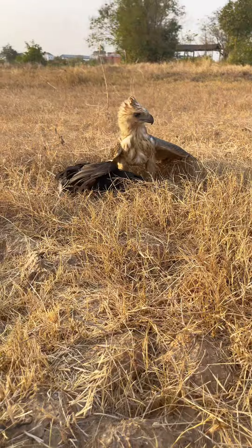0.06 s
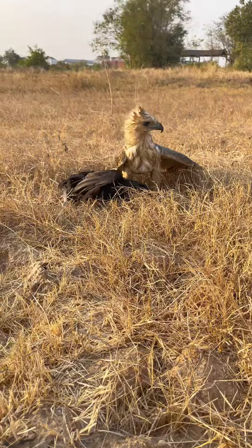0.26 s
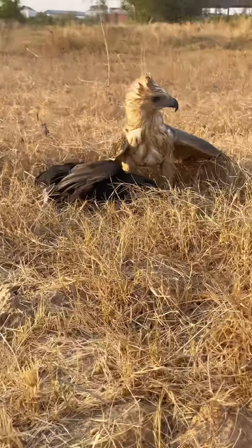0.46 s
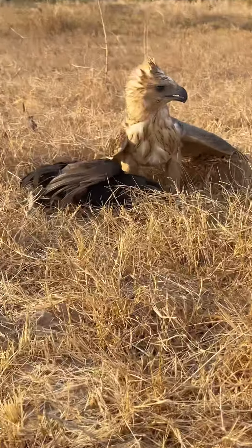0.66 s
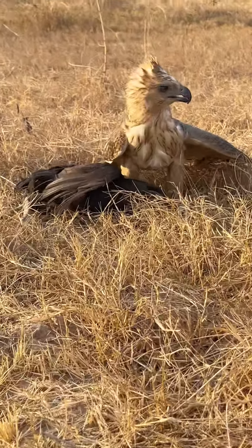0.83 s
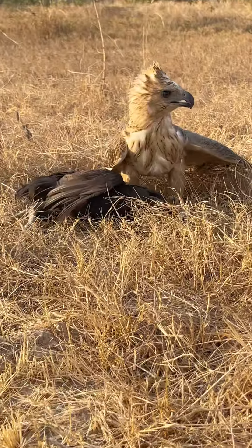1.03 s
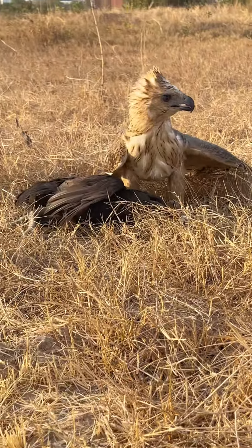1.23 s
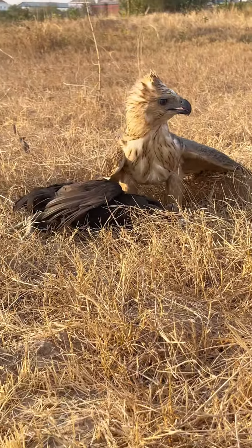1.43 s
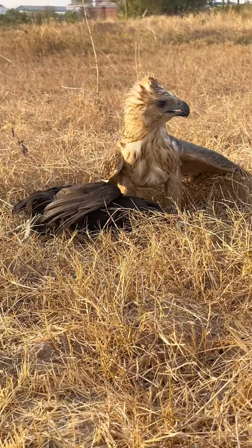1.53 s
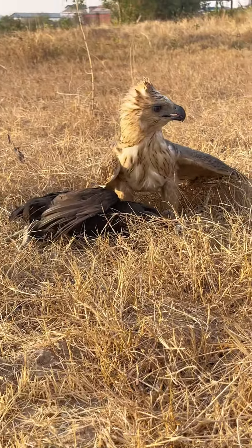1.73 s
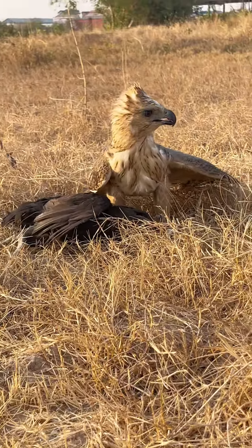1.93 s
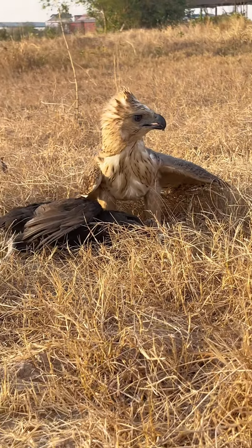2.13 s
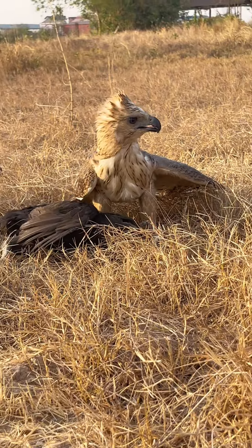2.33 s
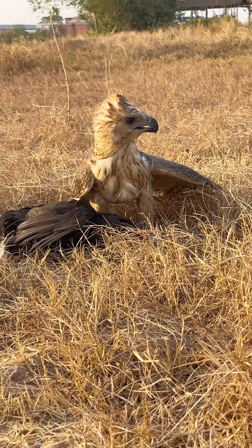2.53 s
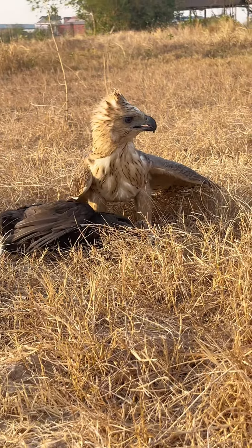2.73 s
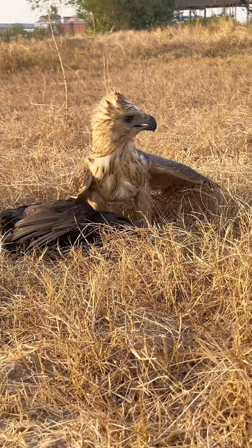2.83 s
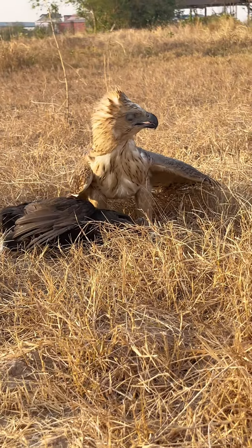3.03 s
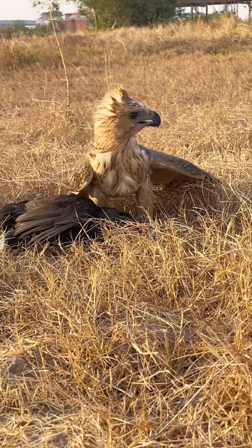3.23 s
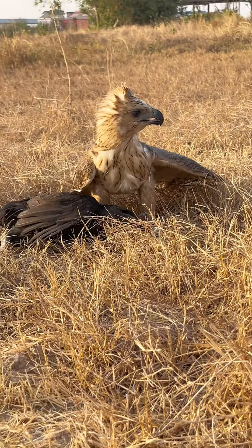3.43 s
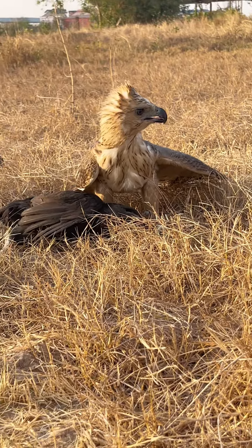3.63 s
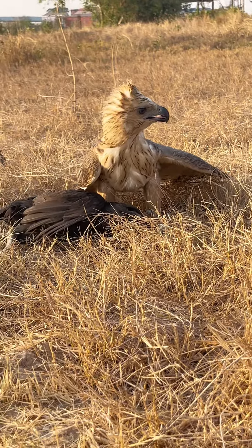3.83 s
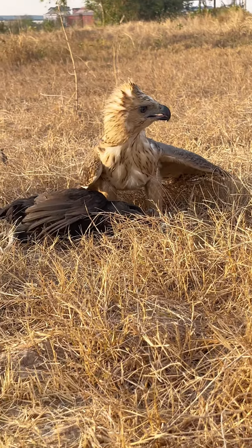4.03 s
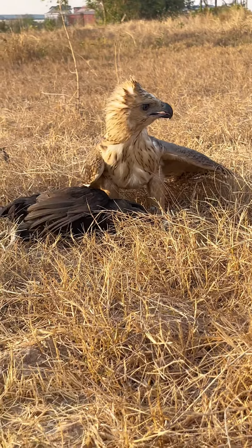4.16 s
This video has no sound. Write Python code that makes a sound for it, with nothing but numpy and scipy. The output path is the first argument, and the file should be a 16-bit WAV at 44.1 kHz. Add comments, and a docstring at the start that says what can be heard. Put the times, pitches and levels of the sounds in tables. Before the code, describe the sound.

Outdoors in a dry open field, a young raptor gives a series of short, thin rising chirps that swell to a brief higher note. A pause follows with dull finger knocks and scuffing on the hand-held phone, then a second series, more knocks, and a faint third series begins. Steady low traffic rumble, soft hiss and tiny distant birds lie beneath.

```python
"""Young bird of prey in a dry field

Rising chirps in series lead to long high notes; a far wall echoes them. Both are sums of a tone and
its overtones. Small birds are short sweeps, a far bird soft falling tones in a diffuse tail. Shaped
noise gives traffic, low scuffing, a haze, high twitter and hiss. Fingers knock (decaying bursts) and
brush (noise puffs) on the hand-held phone. Left leads right by a phase that grows with frequency."""
import sys
import numpy as np
from scipy import signal
from scipy.fft import rfft, irfft, next_fast_len
from scipy.io import wavfile
from scipy.ndimage import uniform_filter1d, map_coordinates

SR = 44100
rng = np.random.default_rng(int(sys.argv[2]) if len(sys.argv) > 2 else 0)


def persist_wave(psi):
    """Save psi, clipped to +-1, as 16-bit WAV."""
    counts = np.round(np.clip(psi, -1, 1) * 32767).astype(np.int16)
    wavfile.write(sys.argv[1], SR, np.atleast_2d(counts).T)


N = 253575


def amp(db):
    """Decibels are logarithmic: 20 dB is a tenfold gain."""
    return 10 ** (np.asarray(db) / 20)


def unit(x):
    """Normalisation by the root mean square: x at rms 1."""
    return x / np.sqrt(np.mean(x ** 2) + 1e-20)


def along(points, hz):
    """Interpolation of (hz, value) points on a logarithmic frequency axis."""
    f, v = np.transpose(points)
    return np.interp(np.log(hz + 1), np.log(f + 1), v)


def wobble(rate, size=N):
    """Band-limited random modulation: a spline through random knots, rate knots a second."""
    knots = rng.standard_normal(int(size * rate / SR) + 4)
    return map_coordinates(knots, [np.arange(size) * rate / SR])


def curves(rows):
    """Linear interpolation in time: one value per sample for each column after the time."""
    s, *cols = np.transpose(rows)
    return [np.interp(np.arange(N) / SR, s, c) for c in cols]


def filtered(x, response):
    """Linear filtering: the spectrum of x times a response of frequency."""
    m = next_fast_len(N + SR // 2)
    return irfft(rfft(x, m) * response(np.fft.rfftfreq(m, 1 / SR)), m)[..., :N]


def add(out, s, x):
    """Superposition: mixes x into out from second s."""
    part = out[..., max(round(s * SR), 0):][..., :x.shape[-1]]
    part += x[..., :part.shape[-1]]


def rush(spectrum, patchy_db):
    """Partly coherent stereo noise: mid (rms 1) plus and minus side, patchy in time and frequency."""
    # likeness of left and right: hz, correlation
    likeness = [(30, .98), (70, .97), (140, .92), (250, .65), (500, .4), (1000, .05), (1900, .45),
                (4000, .6), (5200, .4), (9000, .65), (12000, .75)]
    z = signal.stft(rng.standard_normal((2, N)), nperseg=512)[2]
    patches = uniform_filter1d(rng.standard_normal(z.shape[1:]), 6, 0)
    patches = uniform_filter1d(patches, 6, 1)
    pair = signal.istft(z * amp(patchy_db * unit(patches)), nperseg=512)[1][:, :N]

    def response(hz):
        angle = np.arccos(np.clip(along(likeness, hz), -1, 1)) / 2
        return amp(along(spectrum, hz)) * [np.cos(angle), np.sin(angle)]

    mid, side = filtered(pair, response)
    return np.array([mid + side, mid - side]) / np.sqrt(np.mean(mid ** 2))


def scatter(x, t60, delay):
    """Diffuse reflection: a tail losing 60 dB in t60 s after a delay in s, with fluttering level."""
    t = np.arange(SR // 2) / SR
    tail = rng.standard_normal((2, len(t))) * amp(-60 * t / t60)
    tail /= np.linalg.norm(tail[0])
    late = np.pad(x, (round(delay * SR), 0))[None]
    flutter = .7 + .7 * np.array([wobble(70), wobble(70)])  # moving air
    return flutter * signal.fftconvolve(late, tail, axes=1)[:, :N]


def note(rows, waver_hz):
    """Frequency integrates to phase: phase of a sung note, and a soft-edged gain per dB column."""
    s, hz, *levels = np.transpose(rows)
    t = np.arange(s[0], s[-1], 1 / SR)
    unsteady_hz = np.interp(t, s, hz) + waver_hz * wobble(58.3, size=len(t))
    phase = 2 * np.pi * np.cumsum(unsteady_hz) / SR
    # 6 ms edges; the root of two makes the levels rms levels of a sine
    edge = np.sqrt(2) * np.clip(np.minimum(t - s[0], s[-1] - t) / .006, 0, 1)
    return phase, [edge * amp(np.interp(t, s, db)) for db in levels]


def burst(t, hz, cycles):
    """Dispersion: a bending wave's treble comes first, so the pitch of the swell sags towards hz."""
    u = t * hz / cycles  # 1 at the peak of the swell
    sagging_hz = hz * (1 + 0.92 * np.exp(-1.5 * u))
    return u ** 2 * np.exp(2 - 2 * u) * np.sin(2 * np.pi * np.cumsum(sagging_hz) / SR)


def field():
    """Shaped noise: traffic, a low scuffing murmur, a middle haze, high twitter and steady hiss."""
    # levels of the bands; the haze near 1.7 kHz is probably the diffuse echo of the calls:
    # time_s, murmur_db (low, scuffing), haze_db (middle), twitter_db (high)
    band_levels = [(0.0, -81, -101, -69.5), (0.09, -86, -94, -80), (0.25, -79, -87, -73.5),
                   (0.5, -86, -84.5, -85), (0.8, -84.5, -81.5, -82), (1.2, -84.5, -81.5, -86.5),
                   (1.5, -83, -90.5, -80.5), (1.76, -78, -88.5, -84), (2.03, -84.5, -79.5, -89),
                   (2.09, -66.5, -97, -85), (2.22, -85, -77, -86.5), (2.29, -66, -86, -81),
                   (2.43, -75.5, -94, -86.5), (2.55, -87, -85.5, -88.5), (3.0, -80, -86, -80.5),
                   (3.2, -84.5, -90.5, -86.5), (3.7, -85, -97, -83.5), (4.11, -83.5, -84.5, -88),
                   (4.6, -86, -105, -87), (5.25, -83, -84, -90.5), (5.75, -82.5, -92, -91)]
    # spectrum of the traffic: hz, density_db (relative, per Hz)
    rumble_shape = [(12, -41.5), (20, -19), (32, -5), (91, -1.5), (128, 1), (145, -2.5), (219, -19),
                    (251, -18.5), (291, -26.5), (358, -27.5), (441, -36.5), (560, -40.5), (700, -59),
                    (910, -116), (1540, -120)]
    # spectrum of the low scuffing murmur: hz, density_db
    murmur_shape = [(240, -34), (400, -1), (901, -8), (980, -5.5), (1400, -17), (1820, -60), (3080, -120)]
    # spectrum of the middle haze: hz, density_db
    haze_shape = [(900, -50), (1300, -8.5), (1700, 3.5), (2200, -4), (2700, -13.5), (3500, -27)]
    # spectrum of the high twitter: hz, density_db
    twitter_shape = [(1410, -20), (2400, -3), (2550, -4), (3800, 0), (4860, -4), (5430, -4.5), (6000, -9.5),
                     (7800, -69), (13200, -120)]
    # spectrum of the hiss: hz, density_db
    hiss_shape = [(300, -44), (500, -0.5), (860, -10.5), (1500, -5.5), (1900, -5.5), (2500, -11.5),
                  (3800, -10.5), (5200, -17), (6200, -12.5), (7100, -9.5), (8200, -10.5), (9100, -15),
                  (10200, -8.5), (11200, -9), (12200, -27), (13000, -11.5)]
    murmur_db, haze_db, twitter_db = curves(band_levels)
    rumble_db = -49.5 + 0.27 * wobble(3.4) + 1.74 * wobble(10)
    rumble = amp(rumble_db) * rush(rumble_shape, patchy_db=1.0)
    murmur = amp(murmur_db + 2.5 * wobble(60)) * rush(murmur_shape, patchy_db=3)
    haze = amp(haze_db + 3 * wobble(25)) * rush(haze_shape, patchy_db=3)
    twitter = amp(twitter_db + 2 * wobble(40)) * rush(twitter_shape, patchy_db=3.5)
    hiss = amp(-82.5) * rush(hiss_shape, patchy_db=1)
    return rumble + murmur + haze + twitter + hiss


def small_birds():
    """Frequency sweeps under half-sine envelopes: chips mostly fall, peeps fall, faint chips rise."""
    # chips: start_s, level_db (peak), start_hz, end_hz, length_s
    chips = [(0.041, -66.5, 3700, 3520, 0.056), (1.379, -70.5, 3530, 2650, 0.037),
             (1.486, -72, 3920, 3640, 0.02), (1.677, -70.5, 3750, 3660, 0.018),
             (1.813, -73.5, 2180, 2260, 0.046), (1.917, -68.5, 2670, 1920, 0.02),
             (1.921, -72, 4740, 3690, 0.034), (2.004, -68.5, 2250, 1970, 0.069),
             (2.099, -70, 2210, 1960, 0.029), (2.243, -73.5, 4700, 4120, 0.032),
             (2.517, -68.5, 3900, 2880, 0.058), (2.575, -69, 4600, 3380, 0.056),
             (2.647, -75, 4250, 3340, 0.062), (2.711, -69, 4070, 3000, 0.015),
             (2.72, -65.5, 2000, 1630, 0.02), (2.769, -70, 3920, 3110, 0.017),
             (2.806, -67, 5110, 3080, 0.014), (2.893, -70, 3490, 3380, 0.036),
             (3.069, -70.5, 4510, 3900, 0.0314), (3.423, -72.5, 3590, 3000, 0.053),
             (3.884, -71, 5850, 4910, 0.035), (4.217, -70.5, 5650, 5200, 0.024),
             (4.228, -75.5, 4580, 3320, 0.044), (4.51, -69, 1780, 1680, 0.019),
             (4.583, -73.5, 4260, 3540, 0.065), (2.073, -78, 5530, 5370, 0.041),
             (4.487, -78, 3920, 3510, 0.052), (4.897, -76.5, 4330, 3050, 0.055),
             (5.042, -71, 4210, 3610, 0.035), (5.38, -76, 5300, 3870, 0.051)]
    # a bird with one high short note: start_s, level_db (peak)
    peep_times = [(3.084, -77), (3.274, -78.5), (3.868, -81), (4.297, -78), (4.762, -73), (4.95, -80),
                  (5.358, -72), (5.556, -69)]
    peeps = [(s, db, 7500, 6900, .016) for s, db in peep_times]
    faint = []  # 30 farther chips at random moments
    for when, loud, high in rng.random((30, 3)):
        start_hz = 4100 * (0.71 + 0.29 * high)
        end_hz = 4100 * (.8 + .4 * high) * 0.97
        faint.append((when * N / SR, -82.5 + 6 * loud, start_hz, end_hz, 0.033))
    out = np.zeros(N)
    for s, db, start_hz, end_hz, length in chips + peeps + faint:
        u = np.linspace(0, 1, max(int(length * SR), 50))
        waver = 1 + .06 * wobble(500, size=len(u))
        hz = (start_hz + (end_hz - start_hz) * u) * waver
        add(out, s, amp(db) * np.sin(np.pi * u) * np.sin(2 * np.pi * np.cumsum(hz) / SR))
    return out


def far_bird():
    """Frequency glides: a far bird's soft falling tones, and short tones within the scuffing."""
    # tones: start_s, length_s, level_db, start_hz, end_hz
    # the three from 2.18 to 2.36 s, near 800 Hz, belong to the scuffing and not to the bird
    glides = [(.12, 0.22, -78, 1092, 980), (.35, 0.076, -77, 1020, 967), (1.58, 0.28, -87, 1080, 961),
              (1.87, 0.078, -82, 1030, 952), (2.18, 0.046, -73.5, 890, 810),
              (2.273, 0.059, -68.5, 783, 738), (2.36, 0.093, -79.5, 977, 770),
              (3.5, 0.13, -85.5, 1210, 1180), (3.62, 0.25, -81, 1109, 925), (5.62, 0.18, -84, 1125, 940)]
    peak = 0.3  # share of the length where a tone is loudest
    out = np.zeros(N)
    for s, length, db, start_hz, end_hz in glides:
        peak_hz = start_hz + peak * (end_hz - start_hz)
        rows = [(s, start_hz, db - 3), (s + peak * length, peak_hz, db), (s + length, end_hz, db - 11.5)]
        phase, (gain,) = note(rows, waver_hz=32)
        add(out, s, gain * np.sin(phase))
    return out


def brushes():
    """Friction noise: slightly grainy brushing puffs, and one very short high tick at 4.72 s."""
    # puffs, and the tick at 4.716 s: centre_s, mid_db, treble_db, length_s
    strokes = [(0.074, -89, -70, 0.053), (1.332, -87, -85, 0.072), (2.072, -74, -75, 0.061),
               (3.714, -56, -71, 0.037), (4.096, -72.5, -98, 0.062), (4.661, -78.5, -90, 0.05),
               (4.716, -95, -76, 0.0051), (5.182, -81, -71.5, 0.045)]
    # spectrum of the mid part: hz, density_db (relative, per Hz)
    mid_shape = [(300, -47), (600, -9.5), (1400, 1), (2300, -0.5), (3300, 0), (4600, -12.5), (7200, -11),
                 (9000, -16.5), (11500, -78), (13000, -48)]
    # spectrum of the treble part: hz, density_db
    treble_shape = [(5000, -35), (7000, -8.5), (8800, -10), (10500, 3.5), (11800, -3), (12800, -19)]
    t = np.arange(N) / SR
    mid, treble = np.zeros(N), np.zeros(N)
    for s, mid_db, treble_db, length in strokes:
        bell = np.exp(-2 * ((t - s) / (length / 2)) ** 2)
        mid += amp(mid_db) * bell
        treble += amp(treble_db) * bell
    grain = amp(0.33 * wobble(600))
    return grain * (mid * rush(mid_shape, patchy_db=1) + treble * rush(treble_shape, patchy_db=1))


def knocks():
    """Impact excites the case: a tick, a short ring, a low thump just after, then a deep push."""
    # finger knocks, and two soft rustling touches at 2.07-2.1 s: time_s, thump_db, thump_hz,
    # ring_db, ring_hz, tick_db, push_db, lag_ms (thump and ring, right after left)
    touches = [(.201, -33, 294, -47.5, 644, -53, -28, 0.17), (.228, -44, 355, -79, 680, -74, -48, 0.19),
               (1.871, -41, 728, -60, 1400, -61.5, -41.5, 0.44),
               (2.074, -59, 510, -60, 900, -74, -62, 0.97), (2.097, -63, 600, -54, 830, -75, -51, 0.41),
               (2.162, -37.5, 570, -50.5, 1360, -49, -39.5, 0.59),
               (2.319, -33, 510, -49.5, 1194, -53, -46, 0.47),
               (2.764, -42.5, 720, -60.5, 1530, -80, -47, 0.44), (3.0, -35, 476, -45, 1250, -53, -45, 0.4),
               (3.613, -45, 737, -79, 1520, -84, -58, 0.45)]
    thump_swell_s, thump_late_s, push_late_s = 0.0014, 0.00117, 0.0023
    tick_band = signal.butter(2, [.08, .28], "band")  # shares of half the sample rate
    out, t = np.zeros((2, N)), np.arange(SR // 15) / SR
    for s, thump_db, thump_hz, ring_db, ring_hz, tick_db, push_db, lag_ms in touches:
        thump = burst(t, thump_hz, cycles=thump_swell_s * thump_hz)
        thump = np.pad(thump, (round(thump_late_s * SR), 0))[:len(t)]
        blow = amp(thump_db) * thump + amp(ring_db) * burst(t, ring_hz, cycles=2.03)
        noise = signal.lfilter(*tick_band, rng.standard_normal((2, len(t))))
        add(out, s - .001, amp(tick_db - 60 * t / 0.0086) * noise)  # 60 dB lost in 8.6 ms
        add(out, s + push_late_s, -amp(push_db) * burst(t, 121, cycles=0.3))
        add(out[0], s - .0015, blow)
        add(out[1], s - .0015 + lag_ms / 1000, blow)
    return out + amp(-11) * scatter(out[0], t60=.09, delay=.003)  # the hand scatters it


def eagle():
    """Harmonic synthesis: chirps with unsteady overtones; long notes with locked partials."""
    # rising chirps: peak_s, level_db, pitch_hz, rise_s, fall_s, climb_hz (before the peak),
    # bend_hz (after it), swell_db, flutter (0-1), overtones_db
    chirps = [(0.232, -68.5, 1890, .02, 0.018, 18, -30, 36, 0.65, 1),
              (.447, -68, 1966, 0.059, 0.05, 136, -100, 3.5, 0.5, 3),
              (.635, -58.5, 2026, 0.053, 0.04, 98, -48, 31, 0.3, -0.5),
              (.834, -51, 2072, 0.049, 0.048, 105, -36, 12.5, 0.5, 0.5),
              (1.017, -47.5, 2075, .035, 0.031, 200, 105, 20, 0.18, 0),
              (2.656, -72, 1863, 0.058, 0.048, 190, -32, 10, 0.36, 9),
              (2.885, -69.5, 1925, 0.063, 0.077, 170, -24, 6, 0.54, 0),
              (3.104, -60, 1970, 0.076, 0.029, 170, -26, 20, 0.4, 1.5),
              (3.305, -56, 2001, .06, 0.037, 190, -55, 12, 0.77, -3),
              (3.497, -51, 2085, 0.051, 0.012, 280, 120, 21, 0, -5),
              (5.25, -66, 1837, .05, 0.033, 87, -30, 6.5, 0.23, -1.5),
              (5.467, -65.5, 1906, 0.089, 0.033, 193, -62, 18, 0.4, 7.5),
              (5.687, -59, 1970, .07, 0.032, 200, -60, 15, 0.36, 1)]
    # breakpoints of each long note, the octave with its own level: time_s, pitch_hz, level_db, octave_db
    long_notes = [
        [(1.03, 2575, -76, -72), (1.055, 2620, -72, -68), (1.078, 2622, -53.5, -56.5), (1.095, 2650, -50, -69),
         (1.115, 2635, -50, -63), (1.14, 2633, -55.5, -59), (1.155, 2620, -63, -72), (1.168, 2490, -57.5, -58),
         (1.182, 2520, -72, -86)],
        [(3.497, 2520, -70, -80), (3.515, 2530, -49, -58), (3.535, 2537, -58, -64), (3.555, 2553, -58.5, -62),
         (3.59, 2576, -75, -59.5), (3.607, 2571, -58.5, -66), (3.62, 2540, -62, -53.5),
         (3.635, 2540, -48.5, -59), (3.645, 2465, -60.5, -62), (3.66, 2380, -64, -84)],
    ]
    # overtones of a chirp: multiple, level_db
    chirp_tones = [(2, -38.5), (3, -45.5)]
    # long-note partials above the octave: multiple, level_db (relative to the octave)
    long_tones = [(3, -24.5), (4, -27)]
    # line halfway between second and third partial, one per long note: level_db (same reference)
    halfway = [-24, -43]
    arch = 1.5  # power of the pitch curve: the climb flattens towards the peak
    flutter_s, fade_db = .033, 16.5  # from one swell of the level to the next; loss over the fall
    out = np.zeros(N)
    for s, peak_db, peak_hz, rise, fall, climb_hz, bend_hz, swell_db, flutter, bright_db in chirps:
        t = np.arange(-rise, fall, .001)
        climb = -climb_hz * np.abs(t / rise) ** arch
        bend = bend_hz * np.abs(t / fall) ** arch
        hz = peak_hz + np.where(t < 0, climb, bend)
        beat = np.abs(1 + flutter * np.exp(2j * np.pi * t / flutter_s)) / (1 + flutter)
        swell = np.where(t < 0, swell_db * t / rise, -fade_db * (t / fall) ** 2)
        level_db = peak_db + swell + 20 * np.log10(beat)
        phase, (gain,) = note(np.transpose([s + t, hz, level_db]), waver_hz=12)
        size = len(phase)
        upper = np.zeros(size)
        for k, db in chirp_tones:
            unsteady_gain = amp(db + 5 * wobble(60, size=size))
            upper += unsteady_gain * np.sin(k * phase + .7 * wobble(250, size=size))
        # the power 0.7 makes the overtones grow less than the note
        add(out, s - rise, gain * np.sin(phase) + amp(bright_db) * gain ** 0.7 * upper)
    for rows, half_db in zip(long_notes, halfway):
        phase, (gain, octave) = note(rows, waver_hz=4)
        upper = np.sin(2 * phase) + amp(half_db) * np.sin(5 * phase / 2)
        upper += sum(amp(db) * np.sin(k * phase) for k, db in long_tones)
        add(out, rows[0][0], gain * np.sin(phase) + octave * upper)
    return out


def scene():
    """Superposition of direct and reflected sound: tails for the tones, a late echo for the eagle."""
    call, far, small = eagle(), far_bird(), small_birds()
    tones = call + amp(-12) * scatter(call, t60=.45, delay=.01)
    tones += amp(-21.5) * scatter(call, t60=0.38, delay=0.15)  # far wall
    tones += far + amp(5.5) * scatter(far, t60=0.084, delay=0.00513)
    tones += small + amp(-2) * scatter(small, t60=.2, delay=.005)
    return tones + knocks() + brushes() + field()


def record(dry):
    """Phase difference between left and right, growing with frequency, for all sounds alike."""
    # phase by which left leads right: hz, lead_turns
    phase_lead = [(1200, 0), (2000, 0.107), (2600, 0.153), (4200, 0.17), (5200, 0.69), (5800, 1.13),
                  (7200, 1.197), (9100, 1.443), (11200, 1.81), (12200, 2.01)]
    top_hz = 12950  # nothing is kept above

    def response(hz):
        lead = np.interp(hz, *np.transpose(phase_lead))
        # each side takes half of the turn
        return np.exp(1j * np.pi * np.outer([1, -1], lead)) * (hz < top_hz)

    return filtered(dry, response)


dry = scene()
out = record(dry)
persist_wave(out)
```